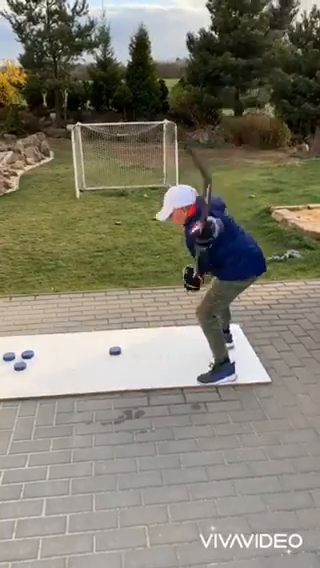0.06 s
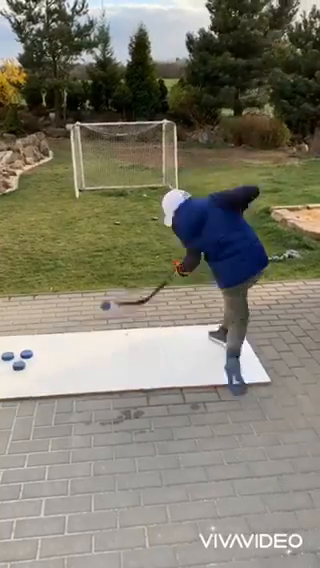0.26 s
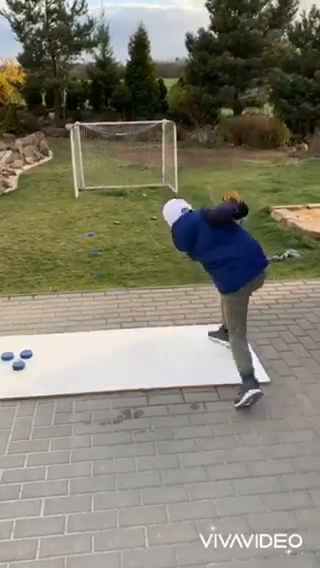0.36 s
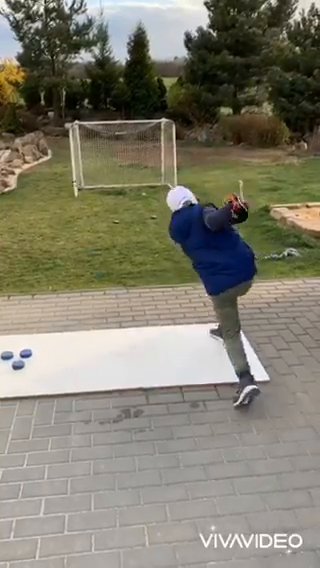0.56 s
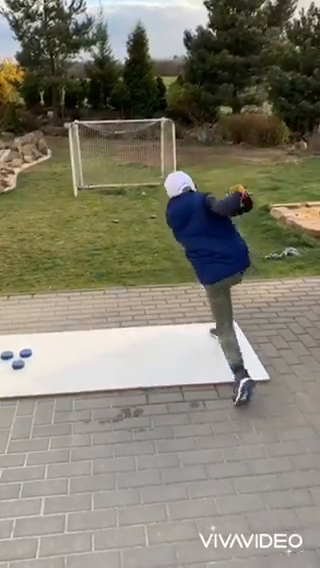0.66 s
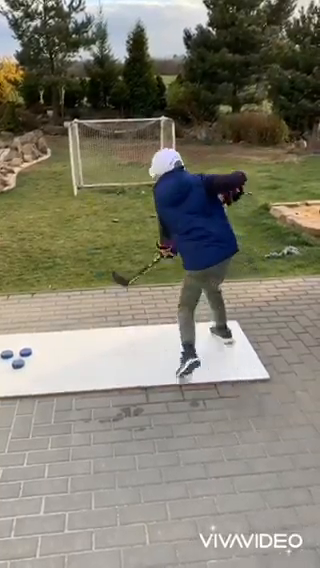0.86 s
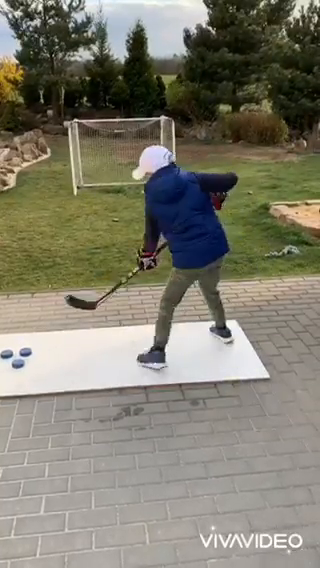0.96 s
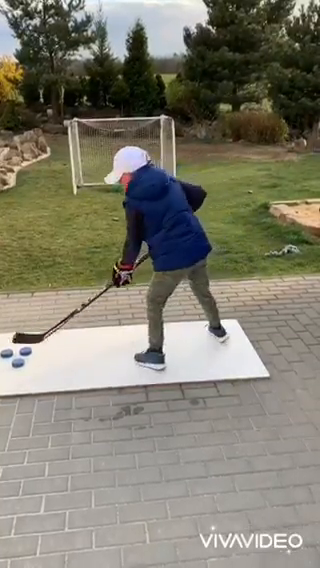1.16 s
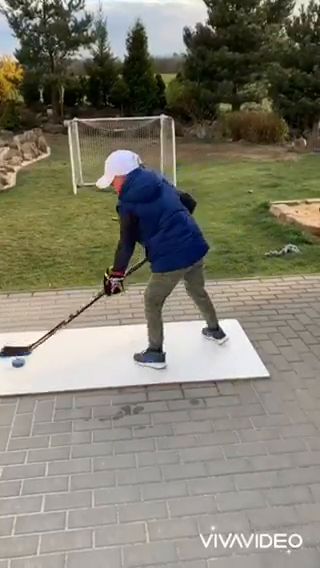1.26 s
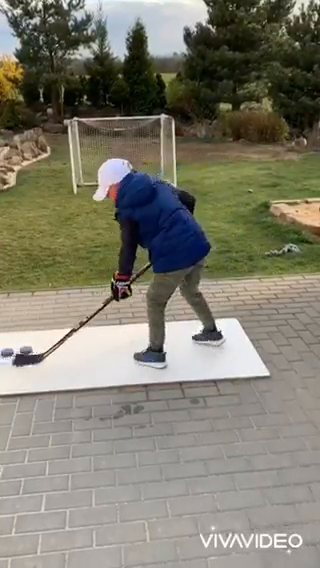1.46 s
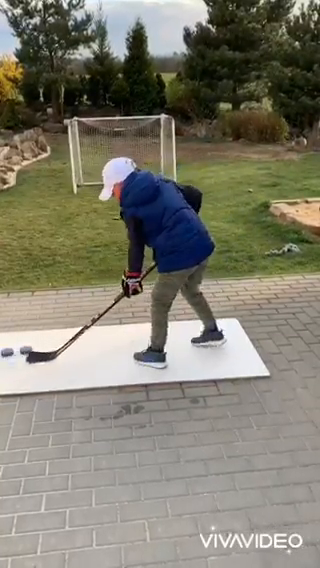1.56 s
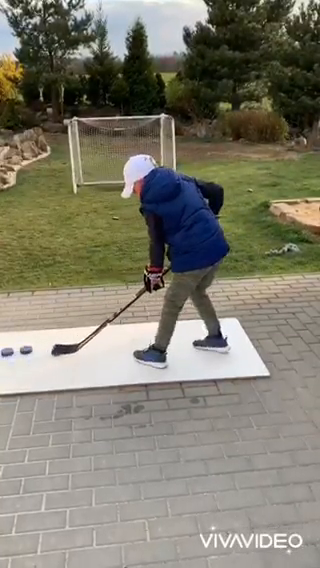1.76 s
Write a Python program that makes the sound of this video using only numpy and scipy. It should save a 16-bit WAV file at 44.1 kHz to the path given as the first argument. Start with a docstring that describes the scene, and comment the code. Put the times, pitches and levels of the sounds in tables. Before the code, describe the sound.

A hockey stick cracks a puck, which clangs off a metal goal post outdoors.

```python
"""Slap shot in a garden

A stick swishes down, scrapes a plastic shooting board and cracks against puck and board.
The puck clangs on a distant goal of steel tubes, and the trees throw back a faint echo of the shot.
Shoes shuffle and thud, then the blade clacks down again and drags the next puck along the board."""
import sys
import numpy as np
from scipy import signal
from scipy.fft import rfft, irfft
from scipy.io import wavfile
from scipy.ndimage import uniform_filter1d, map_coordinates

SR = 44100
rng = np.random.default_rng(int(sys.argv[2]) if len(sys.argv) > 2 else 0)


def master(y):
    """Save y as 16-bit WAV."""
    cut = np.clip(np.atleast_2d(y).T, -1, 1)
    pcm = np.round(cut * 32767)  # scale
    wavfile.write(sys.argv[1], SR, pcm.astype(np.int16))


N = 79380
TIME_S = np.arange(N) / SR
SHOOTER_LAG_MS, GOAL_LAG_MS = .145, .275  # how much later the right side hears each


def gain(db):
    """Turn decibels into a number to multiply by."""
    return 10 ** (np.asarray(db) / 20)


def read_curve(points, hz):
    """Read between a table's points, with pitch spaced in octaves."""
    pitches, values = np.array(points, float).T
    return np.interp(np.log(np.maximum(hz, 1)), np.log(pitches), values)


def colour(sound, tone, tilt_db=0, rasp_hz=None):
    """Filter by a tone curve; tilt brightens or dulls it, rasp adds a broad 6 dB peak."""
    hz = np.arange(N + 1) * SR / (2 * N)
    octave = np.log2(np.maximum(hz, 100))
    curve = gain(read_curve(tone, hz) + tilt_db * octave)
    if rasp_hz:
        curve *= gain(6 * np.exp(-.5 * ((octave - np.log2(rasp_hz)) / .3) ** 2))
    curve /= np.sqrt(np.mean(curve ** 2))
    # fold the filter forward in time, so nothing sounds before its cause
    cepstrum = irfft(np.log(curve))
    cepstrum[1:N] *= 2
    cepstrum[N + 1:] = 0
    return irfft(rfft(sound, 2 * N) * np.exp(rfft(cepstrum)))[..., :N]


def fade(start_s, ring_s):
    """Start at once, then die away by 60 dB in ring_s."""
    age = TIME_S - start_s
    return (age >= 0) * np.exp(-np.log(1000) * np.clip(age / ring_s, 0, 10))


def swell(peak_s, rise_s, fall_s):
    """Rise smoothly to a peak and fall again."""
    age = TIME_S - peak_s
    width = np.where(age < 0, rise_s, fall_s)
    return np.exp(-.5 * np.minimum((age / width) ** 2, 200))


def delay(sound, seconds):
    """Start a sound later."""
    return np.concatenate([np.zeros(int(seconds * SR)), sound])[:N]


def stereo(sound, lag_ms, left_db=0):
    """A sound from the left reaches the right side a little later."""
    right = map_coordinates(sound, [np.arange(N) - lag_ms * SR / 1000], order=3)
    return np.array([sound * gain(left_db / 2), right * gain(-left_db / 2)])


def wide_noise(spread=.6):
    """Noise that comes mostly from the shooter's direction and partly from all around."""
    direct = stereo(rng.standard_normal(N), SHOOTER_LAG_MS)
    return np.sqrt(1 - spread ** 2) * direct + spread * rng.standard_normal((2, N))


def rubbing(strokes, tone, grain_hz=500, grain_db=3.5):
    """Rubbing makes grainy noise that swells and dies with each stroke."""
    out, grain_size = 0, int(SR / grain_hz)
    for peak_s, level_db, rise_s, fall_s, tilt_db, rasp_hz in strokes:
        flicker = np.sqrt(grain_size) * uniform_filter1d(rng.standard_normal(N), grain_size)
        grain = gain(grain_db * flicker)
        rough = wide_noise() * grain / np.sqrt(np.mean(grain ** 2))
        out += gain(level_db) * swell(peak_s, rise_s, fall_s) * colour(rough, tone, tilt_db, rasp_hz)
    return out


# tone of the air: pitch_hz, level_db
AIR_TONE = [(20, -4.5), (55, 7.5), (110, 0), (300, -2.5), (1000, -13.5), (2200, -9.5), (5000, -24.5),
            (9500, -29), (12000, -50.5), (16000, -50.5)]

def still_air():
    """Still outdoor air is a faint, steady, low hush."""
    return gain(-67.5) * colour(wide_noise(), AIR_TONE)


# each swish or scuff: peak_s, level_db, rise_s, fall_s, tilt_db_per_octave, rasp_hz
SWISH_STROKES = [(.04, -66.5, 0.012, 0.038, 1, 1830), (.19, -53, 0.036, 0.036, -2, 1518),
                 (.945, -57, 0.008, 0.017, 1.5, 2000), (.99, -67.5, 0.035, 0.043, 2.5, 7410),
                 (1.065, -65, .01, 0.017, 0, 1677), (1.17, -74, .03, 0.022, 4.5, 2226)]
# their tone: pitch_hz, level_db
SWISH_TONE = [(100, -8), (500, 5), (1000, 1.5), (2000, -2.5), (3200, -4.5), (8000, -19), (10500, -22),
              (12500, -44.5)]

def swishes():
    """Stick and clothes swish and shoes scuff in soft puffs of noise."""
    return rubbing(SWISH_STROKES, SWISH_TONE)


def crack(ring_s):
    """A hard hit gives a sharp click and a very short rattle."""
    rattle = rng.standard_normal(N) * fade(0, ring_s)
    rattle[0] = gain(13)  # the click
    return rattle


def ring(notes):
    """One hit sets off several pure notes, each fading at its own pace."""
    return sum(gain(db) * fade(0, ring_s) * np.sin(2 * np.pi * hz * TIME_S) for hz, db, ring_s in notes)


# each hit of the blade: start_s, level_db, tilt_db_per_octave, knock_hz, knock_db, board_db
BLADE_HITS = [(.158, -59, -14, 1460, -5, -5), (0.1791, -53.5, -15, 1600, 9, 14.5),
              (0.206, -39.5, -19, 3200, 8, -17), (.2215, -7, 3, 1715, -1, -33),
              (.2246, -11, -4, 2367, 1, -32), (0.2263, -14.5, 2.5, 1750, -16, -1),
              (0.2321, -16, -4.5, 600, 3, 1.5), (0.2429, -8, -0.97, 1335, 5.5, -7.5),
              (.2515, -14, -6, 1470, 2, -17), (0.2615, -26.5, 2, 1580, 7, -7),
              (1.3621, -23, 1.5, 1430, 3.5, 3.5), (1.3655, -30.5, -1.5, 667, 3, 2.5),
              (1.371, -23, 1.5, 1300, -9, -4), (1.3819, -38, -2.5, 1600, 9, 1),
              (1.3986, -41.5, 8, 783, 12, -48), (1.4612, -44.5, -2.5, 1900, -5, 8.5),
              (1.472, -33, -9, 1920, -22, -20), (1.511, -58, -6, 1680, 10, 15),
              (1.622, -53, -11, 1210, 3, 7.5)]
# tone of the crack: pitch_hz, level_db
CRACK_TONE = [(40, -20), (110, -16), (280, -10), (390, -4.5), (600, 3), (1000, -3), (1600, 10), (3800, -5),
              (6500, -20), (10000, -20), (12500, -44), (16000, -50)]
# notes that board and stick ring with: pitch_hz, level_db, ring_s
BOARD_NOTES = [(92, -22, .11), (135, -20, .08), (225, -23, .07), (320, -22, .08), (465, -21, .2),
               (580, -13, .09), (655, -14, .09), (766, -18, .1), (883, -21, .1), (1017, -20, .08),
               (1209, -14, .09), (1339, -14, .1), (1455, -14, .08), (1583, -16, .08), (1690, -15, .08),
               (1850, -15, .07), (2334, -18, .08), (2541, -20, .08), (3430, -19, .08), (4030, -22, .08)]
# pitch range of light to hard hits: level_db, low_hz, high_hz
HIT_RANGES = [(-50.5, 250, 5500), (-30.5, 100, 28000), (-5, 50, 17000)]

def stick_hits():
    """Each hit cracks, knocks in the blade and rings the board; light hits have less bass and treble."""
    board = ring(BOARD_NOTES) * (1 - np.exp(-TIME_S / .0012))
    force_db, low_hz, high_hz = np.array(HIT_RANGES, float).T
    out = 0
    for start_s, level_db, tilt_db, knock_hz, knock_db, board_db in BLADE_HITS:
        snap = gain(-2.5) * colour(crack(ring_s=.025), CRACK_TONE, tilt_db)
        knock = ring([(knock_hz, knock_db, .018)])
        hit = snap + knock + gain(board_db) * board
        edges_hz = [np.interp(level_db, force_db, edge) for edge in (low_hz, high_hz)]
        band = signal.butter(2, np.clip(edges_hz, 10, SR / 2 - 10), "band", fs=SR, output="sos")
        out += gain(level_db) * delay(signal.sosfilt(band, hit), start_s)
    return out


# tone of the echo from paving and house wall: pitch_hz, level_db
WALL_TONE = [(60, -7.5), (400, 5), (1200, -5), (4000, 4.5), (9000, -3), (16000, 2)]
# tone of the echo from the trees: pitch_hz, level_db
TREE_TONE = [(60, -18), (400, -4.5), (1000, -4.5), (2500, 2.5), (4000, 3), (6000, -4.5), (9000, -4),
             (16000, -19.5)]

def garden_echo(sound):
    """Paving and house wall throw the sound back at once, the trees a moment later."""
    wall = fade(start_s=.0071, ring_s=.18)
    trees = swell(peak_s=.09, rise_s=.15, fall_s=.15)
    echo = 0
    for shape, level_db, tone in [(wall, -9, WALL_TONE), (trees, -33.5, TREE_TONE)]:
        echo += gain(level_db) * colour(wide_noise() * shape / np.sqrt(np.sum(shape ** 2)), tone)
    return signal.fftconvolve(sound[None], echo, axes=1)[:, :N]


# each scrape: peak_s, level_db, rise_s, fall_s, tilt_db_per_octave, rasp_hz
SCRAPE_STROKES = [(.218, -18, 0.0066, 0.0064, -0.5, 3515), (1.358, -37.5, 0.0057, 0.017, -1, 3540),
                  (1.48, -58.5, 0.038, 0.058, -1.5, 706), (1.625, -57.5, 0.059, 0.023, -5, 1360),
                  (1.69, -59.5, 0.063, 0.037, 0, 2050), (1.8, -61.5, 0.1, 0.026, -3, 750)]
# their tone: pitch_hz, level_db
SCRAPE_TONE = [(100, -22), (500, -5.5), (1200, 0.5), (2400, -3.5), (3900, 1), (5500, -17), (8000, -16.5),
               (11000, -31.5), (16000, -55.5)]

def blade_scrapes():
    """The blade rubs the board, sharply in the shot and softly as it drags the next puck."""
    return rubbing(SCRAPE_STROKES, SCRAPE_TONE)


# each step: peak_s, level_db, rise_s, fall_s, pitch_hz
FOOTSTEPS = [(0.321, -48, 0.0035, 0.0061, 150), (0.671, -58, 0.041, 0.11, 78.6),
             (0.936, -54, 0.046, 0.032, 61.8), (1.072, -61.5, 0.019, 0.046, 56.3),
             (1.158, -61.5, .01, 0.005, 224), (1.211, -60, .02, .02, 52), (1.277, -54.5, 0.011, 0.012, 135),
             (1.304, -41.5, 0.011, 0.01, 78), (1.336, -47, 0.009, 0.035, 60.6),
             (1.44, -47.5, 0.012, 0.019, 87.3), (1.52, -59, 0.032, 0.028, 55.7),
             (1.8, -59, 0.017, .02, 73.8)]
# tone of their rumble: pitch_hz, level_db
THUD_TONE = [(20, -22), (55, 0.5), (110, -6.5), (200, -22.5), (500, -53), (2000, -75)]

def footsteps():
    """Weight shifting on the board makes soft thuds, each a low note plus rumble."""
    rumble = gain(-1.5) * colour(rng.standard_normal(N), THUD_TONE)
    out = 0
    for peak_s, level_db, rise_s, fall_s, pitch_hz in FOOTSTEPS:
        note = np.sqrt(2) * np.sin(2 * np.pi * pitch_hz * (TIME_S - peak_s))
        out += gain(level_db) * swell(peak_s, rise_s, fall_s) * (note + rumble)
    return out


def steel_tubes(notes, rise_s=.004, left_db=2.2, scatter=.6):
    """The wide goal frame rings, each note arriving from a slightly different direction."""
    out = np.zeros((2, N))
    for pitch_hz, level_db, ring_s in notes:
        phase, direction = rng.random(2)
        lag_s = GOAL_LAG_MS / 1000 * (1 + scatter * (2 * direction - 1))
        t = TIME_S[:int(2 * ring_s * SR)]
        note = np.sin(2 * np.pi * (pitch_hz * np.array([t, t - lag_s]) + phase))
        out[:, :len(t)] += gain(level_db) * np.exp(-np.log(1000) * t / ring_s) * note
    balance = gain([[left_db / 2], [-left_db / 2]])
    return out * balance * (1 - np.exp(-TIME_S / rise_s))


# strong notes of the goal frame: pitch_hz, level_db, ring_s
GOAL_NOTES = [(205, -33, .2), (232, -29, .22), (268, -34, .36), (293, -39, .69), (317.5, -42, 1.05),
              (402, -47, .63), (425, -47, .87), (508.2, -34, 1.04), (531.5, -47, .9), (556, -40, .65),
              (580.2, -34, .63), (657.2, -30.5, .57), (699.7, -35, .51), (770, -42, .38), (806, -49, 1),
              (851, -51, .75), (939.6, -36, .42), (1105, -52, .8), (1195, -38, .43), (1287.2, -37, .7),
              (1375.8, -36, .7), (1437, -43, .61), (1517.1, -34.5, .72), (1583, -39, .48), (1701, -45, .4),
              (1852, -39, .48), (2007.1, -36.5, .58), (2482, -40, .45), (2616, -45, .43), (3203, -51, .38),
              (3440, -50, .32), (3645, -56, .38), (4753, -52, .26), (5706, -60, .22), (8554, -52, .22),
              (8680, -56, .2)]
# tone of its shimmer, a crowd of weak notes: pitch_hz, level_db
SHIMMER_TONE = [(130, -16), (230, 2), (400, -11), (650, -8), (1000, -13), (1500, -10), (1750, -15),
                (2000, -11), (2250, -16), (2550, -9), (2750, -18), (3500, -10), (4000, -18), (4700, -18),
                (7300, -31), (8600, -22), (11000, -33), (12000, -45)]
# how long the weak notes last: pitch_hz, ring_s
SHIMMER_RING = [(200, 0.52), (600, 0.82), (1500, 0.82), (3300, 0.31), (5000, 0.15), (10000, 0.19)]
# tone of the puck's smack on the post: pitch_hz, level_db
SMACK_TONE = [(150, -18.5), (600, -15), (1800, 9.5), (3200, -15.5), (4600, -6), (6500, -32), (9000, -11),
              (12000, -30), (16000, -35)]

def goal_clang(start_s=.6143, weak_count=480, shimmer_db=-34):
    """The puck smacks the post; strong notes and a shimmer of weak ones ring on in the steel."""
    weak_hz = 130 * 90 ** ((np.arange(weak_count) + rng.random(weak_count)) / weak_count)
    # high notes lie further apart, so each gets more power
    weak_db = read_curve(SHIMMER_TONE, weak_hz) + 10 * np.log10(weak_hz)
    weak_db += shimmer_db - 10 * np.log10(np.sum(gain(weak_db) ** 2) / 2)
    weak_notes = zip(weak_hz, weak_db, read_curve(SHIMMER_RING, weak_hz))
    clang = steel_tubes(GOAL_NOTES) + steel_tubes(weak_notes)
    smack = gain(-21.5) * colour(crack(ring_s=.02), SMACK_TONE)
    clang += stereo(smack, GOAL_LAG_MS, left_db=6.5)
    return np.array([delay(side, start_s) for side in clang])


def scene():
    """The shooter close by, the goal across the lawn, quiet air behind."""
    hits, scrapes = stick_hits(), blade_scrapes()
    shooter = stereo(hits + footsteps(), SHOOTER_LAG_MS) + scrapes + swishes()
    return shooter + garden_echo(hits + scrapes[1]) + goal_clang() + still_air()


# overall tone, duller above 11 kHz: pitch_hz, level_db
OVERALL_TONE = [(20, -9.5), (45, -5.5), (300, -1), (385, -3), (470, -0.5), (10800, -2), (12000, -8.5),
                (16000, -6.5)]

def record(dry):
    """Colour the whole sound, flatten the loudest peaks and cut the highest treble."""
    curve = gain(read_curve(OVERALL_TONE, np.linspace(0, SR / 2, N)))
    heard = colour(dry, OVERALL_TONE) * np.sqrt(np.mean(curve ** 2))
    treble_cut = signal.ellip(8, .2, 70, 16200, fs=SR, output="sos")
    return signal.sosfilt(treble_cut, np.clip(heard, -1, 1))


dry = scene()
out = record(dry)
master(out)
```